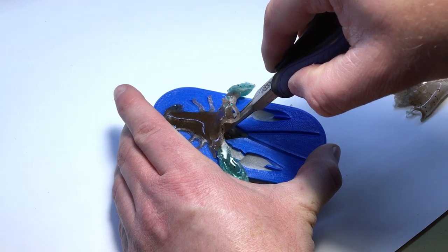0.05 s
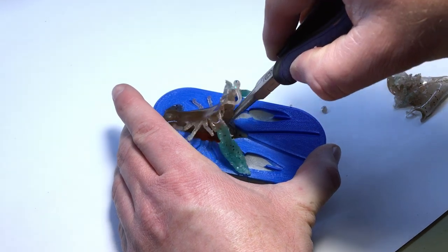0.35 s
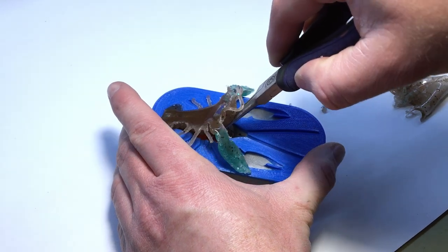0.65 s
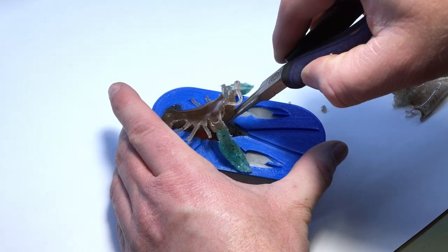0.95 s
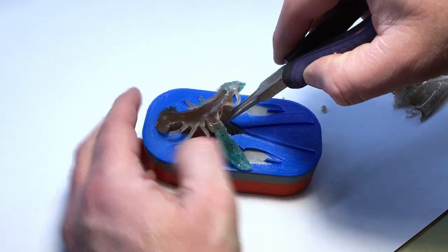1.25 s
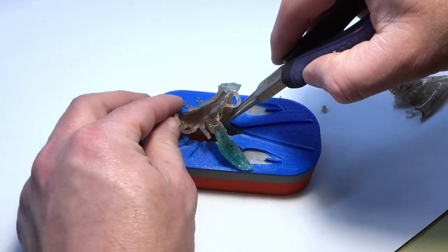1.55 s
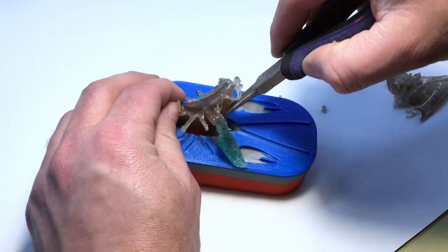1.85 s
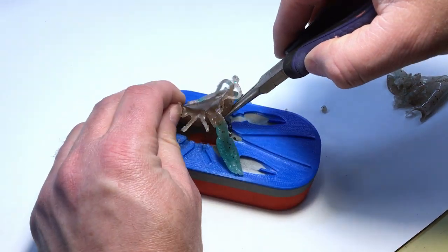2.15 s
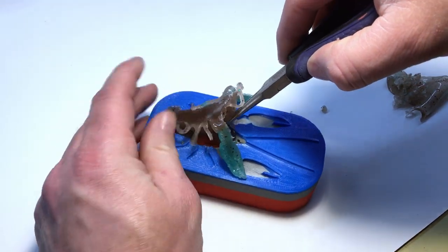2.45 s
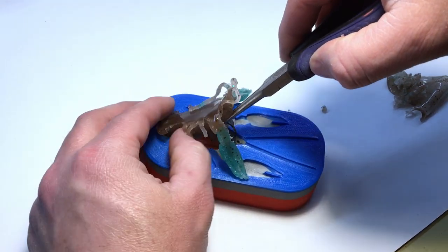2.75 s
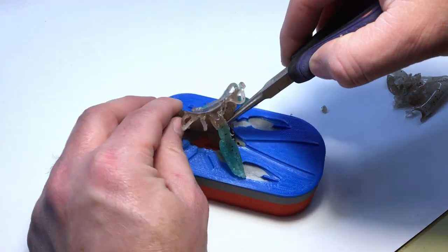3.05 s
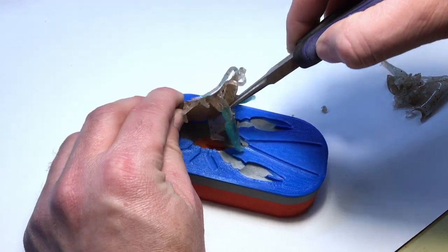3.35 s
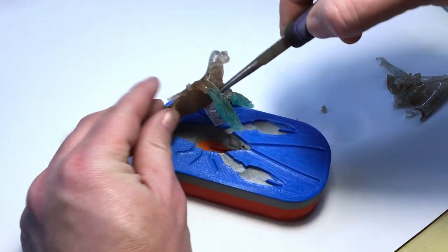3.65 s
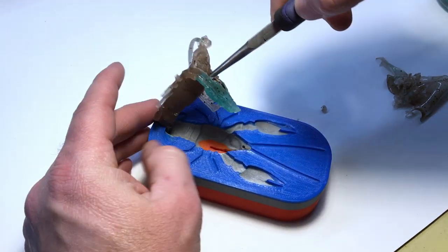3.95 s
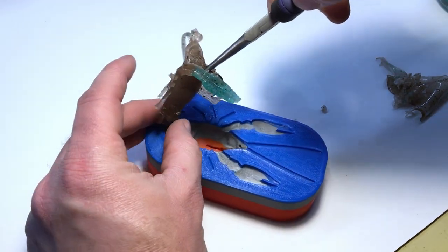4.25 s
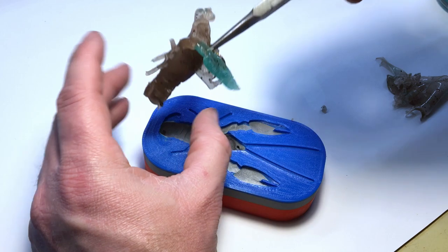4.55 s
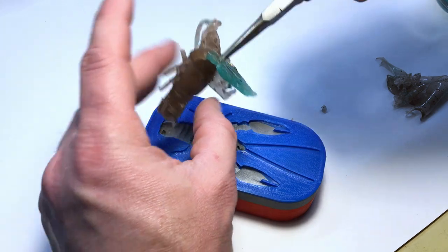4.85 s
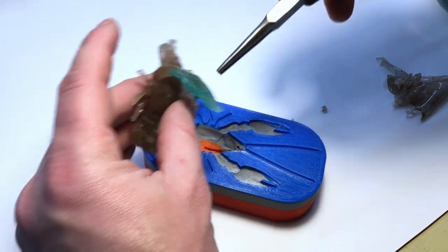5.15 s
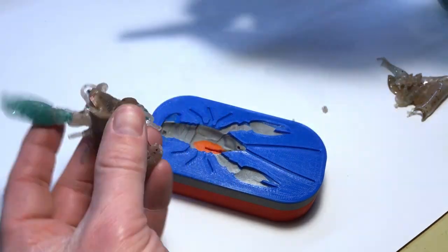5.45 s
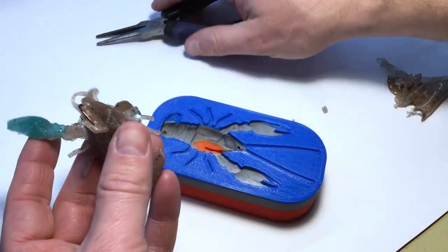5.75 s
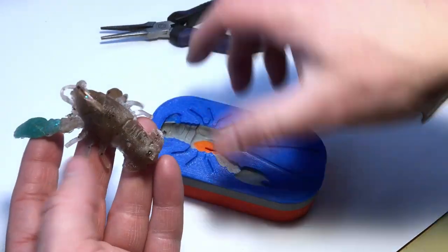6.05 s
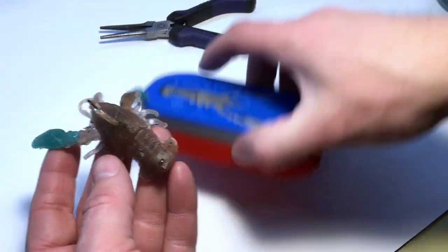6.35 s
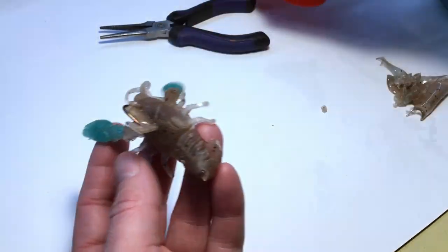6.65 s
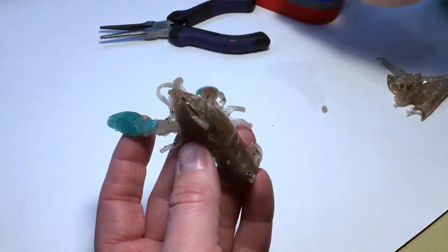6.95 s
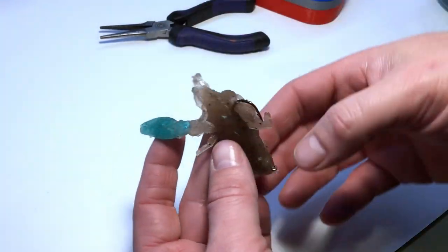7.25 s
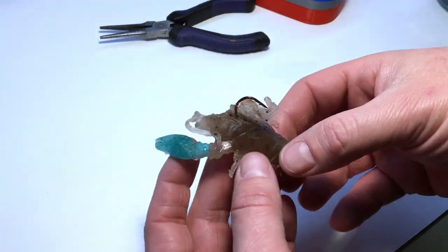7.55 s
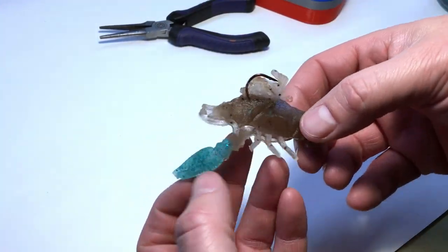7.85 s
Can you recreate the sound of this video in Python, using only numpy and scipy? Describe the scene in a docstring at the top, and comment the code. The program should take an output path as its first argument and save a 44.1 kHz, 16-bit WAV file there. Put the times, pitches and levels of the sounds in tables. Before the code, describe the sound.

Close up and only on the left side, a soft plastic lure is worked free of its mold: quiet skin drags, small sticky clicks, dull little bumps and a short squeak against steel. Then comes the loudest sound, pliers clattering onto a desk, followed about a second later by a double knock as the hard mold is put down. A faint low rumble fills the small room throughout.

```python
"""Faint rubbing, tacky snaps and ticks, then a loud clatter and two knocks, over a low room rumble.
A soft plastic lure is pried from its hollow mould with pliers: fingers drag on the mould, the lure
peels off in tiny slips and squeaks on the steel, and the jaws tick. The pliers drop and bounce on a
desk, ringing its modes; the mould is set down and its shell rings too. Close up, left channel only."""
import sys
import numpy as np
from scipy import signal
from scipy.fft import rfft, irfft, next_fast_len
from scipy.io import wavfile
from scipy.ndimage import map_coordinates

SR = 44100
rng = np.random.default_rng(int(sys.argv[2]) if len(sys.argv) > 2 else 0)


def dump_mix(stems):
    """Bounce the given channels to the path in sys.argv[1] as a 16-bit WAV at rate SR."""
    frames = np.atleast_2d(stems).T  # one column per channel
    limited = np.clip(frames, -1, 1)  # hard clip at full scale
    pcm = np.round(limited * 32767).astype(np.int16)
    wavfile.write(sys.argv[1], SR, pcm)


N = 348823
TIME_S = np.arange(N) / SR
AGE_S = np.arange(SR // 2) / SR  # time since a contact

# mould body spectrum: f/Hz, level/dB
MOULD_BODY = [(150, 1.5), (230, -1), (340, 6), (430, -7.5), (560, -11.5), (900, -27.5), (3000, -36.5)]


def amp(db):
    """Decibels to gain."""
    return 10 ** (np.asarray(db) / 20)


def unit(x):
    """Scale to rms 1."""
    return x / np.sqrt(np.mean(x ** 2) + 1e-20)


def along(points, hz):
    """Interpolate (f/Hz, value) points on a log frequency axis."""
    point_hz, values = np.transpose(points)
    return np.interp(np.log(hz + 1), np.log(point_hz + 1), values)


def filtered(x, response):
    """Apply a frequency response by FFT."""
    size = next_fast_len(len(x) + 8192)
    hz = np.fft.rfftfreq(size, 1 / SR)
    return irfft(rfft(x, size) * response(hz), size)[:len(x)]


def coloured(x, spectrum):
    """Shape x by (f/Hz, level/dB) points."""
    return filtered(x, lambda hz: amp(along(spectrum, hz)))


def butter(x, kind, corner_hz):
    """Second-order high- or low-pass."""
    return signal.lfilter(*signal.butter(2, corner_hz, kind, fs=SR), x)


def resonant(x, centre_hz, q):
    """One broad resonance; keeps the power of white noise."""
    b, a = signal.iirpeak(centre_hz, max(q, centre_hz / 12000), SR)
    return signal.lfilter(b, a, x) / np.sqrt(b[0])


def noise(spectrum, size):
    """Coloured noise, rms 1."""
    return unit(coloured(rng.standard_normal(size), spectrum))


def grit(size, rough_db):
    """Noise of tiny slips of uneven strength."""
    strength = unit(np.convolve(rng.standard_normal(size), np.hanning(40), "same"))
    return unit(rng.standard_normal(size) * amp(rough_db * strength))


def wobble(knots_per_s):
    """Smooth random curve."""
    knots = rng.standard_normal(int(N * knots_per_s / SR) + 4)
    return map_coordinates(knots, [TIME_S * knots_per_s])


def swell(start_s, length_s, attack_s, release_s):
    """Attack, hold and release of one hand movement."""
    ramp = np.minimum((TIME_S - start_s) / attack_s, (start_s + length_s - TIME_S) / release_s)
    return np.clip(ramp, 0, 1)


def rise(tau_s):
    """Exponential onset after a contact."""
    return 1 - np.exp(-AGE_S / tau_s)


def fade(t60_s):
    """Exponential decay after a contact."""
    return amp(-60 * AGE_S / t60_s)


def ring(modes, scatter_db):
    """Damped modes, strengths scattered at each strike."""
    return sum(amp(db + scatter_db * rng.standard_normal()) * fade(t60_s) * np.sin(2 * np.pi * hz * AGE_S)
               for hz, db, t60_s in modes)


def burst(spectrum, t60_s):
    """Dying noise; the decay alone sets its energy."""
    decay = fade(t60_s)
    return unit(noise(spectrum, len(AGE_S)) * decay) * np.sqrt(np.mean(decay ** 2))


def add(track, start_s, sound):
    """Mix a sound into a track."""
    start = round(start_s * SR)
    track[start:start + len(sound)] += sound[:N - start]


def background(hiss_db=-77.5):
    """Drifting low room rumble and faint microphone hiss."""
    # rumble envelope: t/s, level/dB
    rumble_levels = [(0, -60.5), (1.4, -62), (2, -71), (2.45, -62), (4.8, -63), (5.5, -57.5), (6.3, -65),
                     (6.8, -61.5), (7.9, -60.5)]
    # rumble and hiss spectra: f/Hz, level/dB
    rumble_spectrum = [(15, -37.5), (30, -12), (48, 3), (65, -6.5), (90, -6), (140, -8.5), (180, -16.5),
                       (240, -22), (350, -22.5), (500, -34.5), (1000, -43), (4000, -76)]
    hiss_spectrum = [(100, 0.5), (500, 2), (1000, 2.5), (2000, -0.5), (4000, -4.5), (8000, -7.5),
                     (15500, -11)]
    rumble_db = np.interp(TIME_S, *np.transpose(rumble_levels))
    return amp(rumble_db) * noise(rumble_spectrum, N) + amp(hiss_db) * noise(hiss_spectrum, N)


def room(x, early_db, tail_db):
    """Near surfaces reflect within milliseconds, then a small room dies away."""
    # room decay: f/Hz, t60/s
    decay_times = [(150, .34), (500, 0.36), (2000, 0.19), (6000, 0.14), (14000, 0.037)]
    hz, age_s, bands = signal.stft(rng.standard_normal(len(AGE_S)), SR, nperseg=256)
    bands = bands * amp(-60 * age_s / along(decay_times, hz)[:, None])
    tail = signal.istft(bands, SR, nperseg=256)[1][:len(AGE_S)] * rise(0.007)
    early = np.zeros(len(tail))
    strengths = rng.standard_normal(size=10)
    delays_s = rng.uniform(.002, .014, size=10)
    early[(delays_s * SR).astype(int)] = strengths
    response = amp(early_db) * early / np.linalg.norm(early) + amp(tail_db) * tail / np.linalg.norm(tail)
    return x + signal.fftconvolve(x, response)[:N]


def mould_cavities(x):
    """The hollow mould resonates along with the direct sound."""
    # cavity modes: f/Hz, width/Hz, level/dB
    cavities = [(980, 80, 8), (1400, 110, 7), (1730, 60, 1), (2170, 80, 5), (2620, 150, 9), (3200, 110, 7),
                (3650, 80, 1), (5260, 220, 6), (6300, 350, 2)]

    def response(f):
        modes = sum(amp(db) * 1j * f * width_hz / (hz * hz - f * f + 1j * f * width_hz)
                    for hz, width_hz, db in cavities)
        return amp(-4.0) * (1 + modes)

    return filtered(x, response)


def fingers():
    """Skin drags and hisses across the mould; its body groans under strokes and grips."""
    # finger strokes: t/s, length/s, drag/dB, skin hiss/dB
    strokes = [(0.159, 0.25, -73, -82), (0.232, 0.18, -71.5, -75), (1.087, 0.41, -81, -77),
               (1.176, 0.11, -82, -86), (1.417, 0.12, -70, -73.5), (1.539, 0.11, -70.5, -71),
               (1.615, 0.12, -73, -81), (1.692, 0.47, -79, -87.5), (1.97, 0.23, -76, -75.5),
               (2.285, 0.082, -69, -73), (2.326, 0.44, -77.5, -76.5), (2.404, 0.13, -71.5, -75),
               (2.586, 0.11, -73.5, -76), (2.742, 0.13, -72.5, -75), (2.859, 0.072, -68, -73),
               (2.928, 0.36, -72, -77.5), (3.031, 0.027, -59.5, -68.5), (3.184, 0.33, -84.5, -84.5),
               (3.455, 0.073, -76, -78), (3.596, 0.58, -91, -82), (4.165, 0.087, -78, -76.5),
               (4.252, 0.15, -76, -80.5), (5.796, 0.66, -70, -73.5), (6.228, 0.11, -64.5, -68),
               (6.303, 0.12, -65, -71.5)]
    # hand clamps the mould while the pliers pull: t/s, length/s, groan/dB
    grips = [(1.388, 0.85, -76), (2.606, 0.5, -78.5), (3.96, 0.45, -82)]
    # drag and skin hiss spectra: f/Hz, level/dB
    drag_spectrum = [(400, -15), (750, -7), (1000, -8.5), (1400, -6.5), (2000, -4), (2650, -6.5),
                     (3500, -5.5), (4600, -4), (7000, -44.5), (16000, -76)]
    skin_spectrum = [(2000, -28.5), (4000, -2.5), (5400, -0.5), (7500, 0), (9300, 2), (10500, -4),
                     (12000, -0.5), (15500, -8)]
    drag_gain, skin_gain = np.zeros(N), np.zeros(N)
    for start_s, length_s, drag_db, skin_db in strokes:
        speed = swell(start_s, length_s, attack_s=.35 * length_s, release_s=.59 * length_s)
        drag_gain = np.hypot(drag_gain, amp(drag_db) * speed)
        skin_gain = np.hypot(skin_gain, amp(skin_db) * speed)
    grip_gain = sum(amp(db) * swell(start_s, length_s, attack_s=0.073, release_s=0.073)
                    for start_s, length_s, db in grips)
    groan = np.hypot(amp(11.5) * grip_gain, amp(3) * drag_gain) * noise(MOULD_BODY, N)
    drag = amp(1.5) * drag_gain * unit(coloured(grit(N, rough_db=4.0), drag_spectrum))
    skin = amp(7.0) * skin_gain * unit(coloured(grit(N, rough_db=1.5), skin_spectrum))
    return (drag + skin + groan) * amp(2.0 * wobble(knots_per_s=45))


def peels():
    """Runs of tiny slips catch, swell and stop, each in a narrow band."""
    # stick-slip scrapes and peels: t/s, length/s, level/dB, centre f/Hz
    runs = [(0.19, 0.053, -71, 1800), (0.26, 0.043, -60, 2560), (0.334, 0.024, -71, 1600),
            (0.518, 0.045, -64.5, 2340), (0.571, 0.047, -71, 2786), (0.747, 0.034, -65, 2800),
            (2.291, 0.079, -67.5, 2380), (2.768, 0.07, -64, 2800), (2.774, 0.083, -68, 1010),
            (3.068, 0.012, -59, 2230), (3.145, 0.066, -71, 1540), (3.281, 0.019, -65.5, 1890),
            (6.326, 0.075, -64.5, 2330), (6.551, 0.017, -64.5, 2150), (6.604, 0.02, -66.5, 2610),
            (6.648, 0.022, -66, 3360), (6.7, 0.031, -66.5, 2204), (6.772, 0.012, -70.5, 1874),
            (6.85, 0.072, -56.5, 2300), (6.908, 0.055, -51, 4760), (7.387, .04, -75.5, 7010)]
    out = np.zeros(N)
    for start_s, length_s, db, hz in runs:
        size = int(length_s * SR)
        slips = grit(size, rough_db=3.5)
        band = resonant(resonant(slips, hz, q=1.8), hz, q=1.8)
        envelope = np.sqrt(signal.windows.tukey(size, .6))
        add(out, start_s, amp(db - 5.5) * unit(band) * envelope)
    return out


def squeak(start_s=5.155, length_s=.034, slip_hz=2150, level_db=-56.5):
    """The lure sticks and slips on the steel jaws at a high, unsteady rate."""
    # squeak colour: f/Hz, level/dB
    rasp_spectrum = [(300, -33), (1400, -8), (2100, -8), (4300, -1.5), (6300, -4), (8500, -16),
                     (11000, -3.5), (15000, -9)]
    size = int(length_s * SR)
    rate_hz = slip_hz * (1 + .07 * wobble(knots_per_s=1200)[:size])
    stretch = (np.cumsum(rate_hz) / SR) % 1
    slips = unit(np.diff(stretch, prepend=stretch[0]))
    rasp = coloured(slips + amp(-6.5) * rng.standard_normal(size), rasp_spectrum)
    rasp *= amp(5.2 * wobble(knots_per_s=285)[:size])
    envelope = np.sqrt(signal.windows.tukey(size, .5))
    out = np.zeros(N)
    add(out, start_s, amp(level_db) * unit(rasp) * envelope)
    return out


def snaps():
    """The lure lets go or the jaws touch: a tiny click and a dull bump in the mould."""
    # lure snaps and jaw ticks: t/s, click/dB, centre f/Hz, bump/dB
    contacts = [(.3962, -48, 3470, -83), (0.5224, -53.5, 3770, -58.5), (0.6255, -57.5, 2430, -64),
                (0.7796, -52, 2900, -65), (.853, -84, 2000, -57), (0.964, -67, 1980, -79),
                (1.2066, -55, 2330, -55.5), (2.09, -51, 1800, -48), (2.103, -70, 1500, -55.5),
                (2.153, -57, 3500, -59.5), (2.531, -60.5, 1720, -62), (2.89, -50.5, 1490, -59),
                (3.0467, -60, 2500, -62), (3.0772, -49.5, 1680, -78), (3.1332, -60, 6000, -73),
                (4.178, -55, 2800, -58.5), (5.0697, -43.5, 7100, -80), (5.185, -53.5, 6000, -65),
                (6.275, -64, 3030, -53.5), (6.361, -65.5, 2466, -51.5), (7.447, -67, 2820, -64)]
    out = np.zeros(N)
    for start_s, click_db, hz, bump_db in contacts:
        envelope = amp(-0.5) * fade(0.0057) + amp(-10.5) * fade(0.036)
        click = resonant(rng.standard_normal(len(AGE_S)) * envelope, hz, q=1.63)
        bump = burst(MOULD_BODY, t60_s=0.13) * rise(0.0014)
        add(out, start_s, amp(click_db) * click + amp(bump_db + 4.5) * bump)
    return out


def desk_blow(thump_db, clack_db, hardness_hz, tick_db):
    """A blow bends the desk top, rings it and ticks at the contact; soft blows lack the upper modes."""
    # low desk modes: f/Hz, level/dB, t60/s
    low_modes = [(95, -16, .07), (122, -14, .08), (152, -14, .08), (181, -11, .15), (204, 0, .145),
                 (298, -9, .12), (374, -10, .11), (421, -16, .09)]
    # dense upper desk modes: f/Hz, level/dB
    upper_modes = [(335, -7), (484, -4), (515, 0), (544, -3), (582, 0), (668, -3), (783, -5), (888, 3),
                   (930, -3), (1007, -1), (1113, 0), (1268, -2), (1375, -2), (1480, 0), (1611, 2),
                   (1902, -5), (2035, -5), (2492, -1), (2696, -2), (3200, 1), (3550, 0), (3990, -3),
                   (4630, -6), (5600, -6)]
    # contact noise spectra: f/Hz, level/dB
    crack_spectrum = [(150, -15), (400, 4.5), (1500, -2), (3600, -1.5), (5800, -7), (7500, -27.5),
                      (15000, -24)]
    tick_spectrum = [(500, -24), (2000, -8.5), (3500, 2), (6300, 0), (8000, -3.5), (10500, -3),
                     (12500, -2.5), (15500, -11.5)]
    thump = amp(1.5) * ring(low_modes, scatter_db=0.8) * rise(0.00075)
    thump = butter(thump, "high", 85)  # the thump carries little below 85 Hz
    t60_1khz_s, damping_power = 0.053, .55
    modes = [(hz, db, t60_1khz_s * (hz / 1000) ** -damping_power) for hz, db in upper_modes]
    # the strike point sets each mode's sign
    board = sum(rng.choice([-1, 1]) * ring([mode], scatter_db=1.5) for mode in modes)
    crack = butter(burst(crack_spectrum, t60_s=.024), "high", 230)  # a small contact radiates no bass
    clack = (amp(-10.5) * board + amp(6) * crack) * rise(0.0005)
    clack = butter(clack, "low", min(hardness_hz, SR / 3))
    tick = amp(4.5) * burst(tick_spectrum, t60_s=0.0056) + amp(-5.5) * burst(tick_spectrum, t60_s=0.042)
    return amp(thump_db) * thump + amp(clack_db) * clack + amp(tick_db) * tick


def knocks():
    """Pliers, then mould, strike the desk; the mould's hard shell rings as well."""
    # pliers touch, drop and bounce: t/s, thump/dB, clack/dB, hardness/Hz, tick/dB
    plier_blows = [(5.726, -57, -45, 5070, -37), (5.729, -31, -29.5, 616, -62.5),
                   (5.748, -85, -54.5, 4100, -55), (5.8763, -55, -71, 1500, -55.5),
                   (5.9086, -72, -51.5, 3000, -45.5), (5.9173, -20, -29.5, 500, -34.5),
                   (5.927, -29, -19, 1110, -31.5), (5.94, -26, -15.5, 4500, -25.5),
                   (5.9676, -31.5, -22.5, 1070, -39), (5.9794, -55, -43, 2000, -39.5),
                   (6, -32.5, -48, 700, -62), (6.0259, -33, -35.5, 593, -64), (6.0476, -34, -33, 2250, -44),
                   (6.099, -35, -48, 552, -75.5), (6.133, -69.5, -57, 6000, -49.5),
                   (6.153, -41, -55, 790, -75)]
    # mould lands on an edge, scuffs and settles: t/s, thump/dB, clack/dB, hardness/Hz, tick/dB
    mould_blows = [(6.8424, -27, -32, 1810, -42.5), (6.8666, -50.5, -52, 1500, -54.5),
                   (6.9003, -67, -55, 5990, -45.5), (6.9253, -69, -54.5, 5960, -41),
                   (6.932, -40, -42.5, 3500, -38.5), (6.9353, -31.5, -29.5, 1160, -40.5),
                   (7.035, -52, -70, 500, -90)]
    # shell modes: f/Hz, level/dB re clack, t60/s
    shell_modes = [(1990, -18.5, 0.091), (2090, -25, 0.085), (2200, -23, 0.051), (2476, -20, 0.069),
                   (2690, -28, 0.1)]
    out = np.zeros(N)
    for start_s, *strike in plier_blows:
        add(out, start_s, desk_blow(*strike))
    for start_s, thump_db, clack_db, hardness_hz, tick_db in mould_blows:
        desk = desk_blow(thump_db, clack_db, hardness_hz, tick_db)
        shell = amp(clack_db) * ring(shell_modes, scatter_db=2)
        add(out, start_s, desk + shell)
    return out


def scene():
    """Handling and knocks in a small room, on the left channel; the right is silent."""
    handling = mould_cavities(snaps() + peels() + fingers()) + squeak()
    left = room(knocks() + handling, early_db=-17.0, tail_db=-22) + background()
    return np.array([left, np.zeros(N)])


def record(dry):
    """Deep-bass roll-off and a steep upper band limit."""
    bottom_hz, top_hz = 30, 15900
    dry = butter(dry, "high", bottom_hz)
    return np.array([filtered(channel, lambda hz: 1 / (1 + (hz / top_hz) ** 120)) for channel in dry])


dry = scene()
out = record(dry)
dump_mix(out)
```